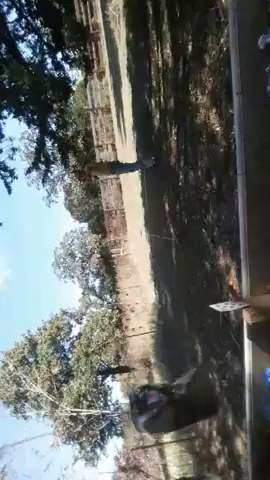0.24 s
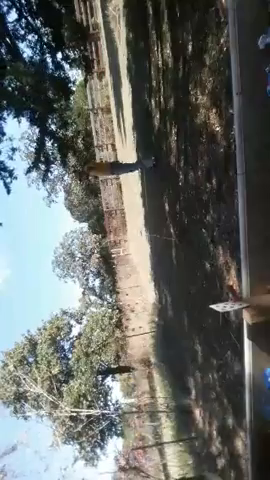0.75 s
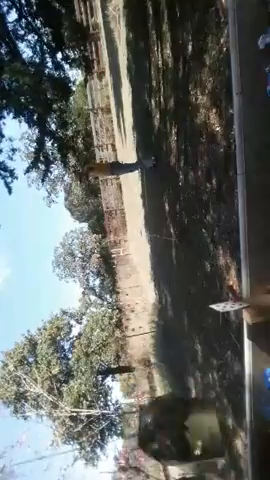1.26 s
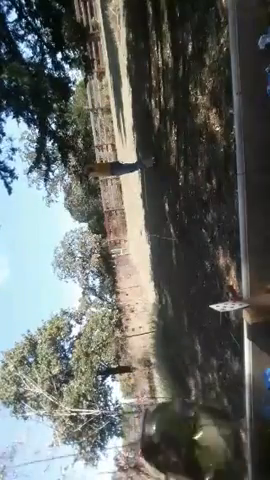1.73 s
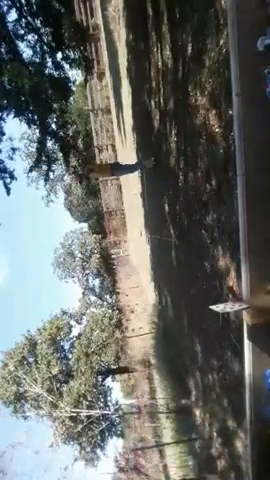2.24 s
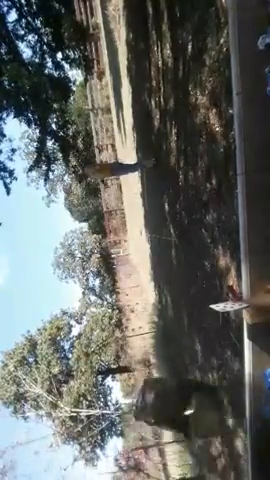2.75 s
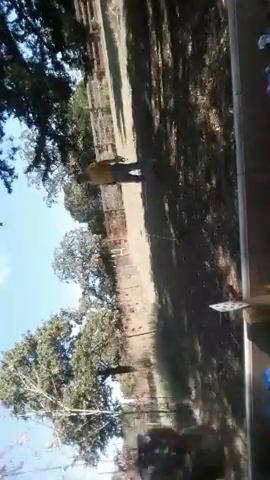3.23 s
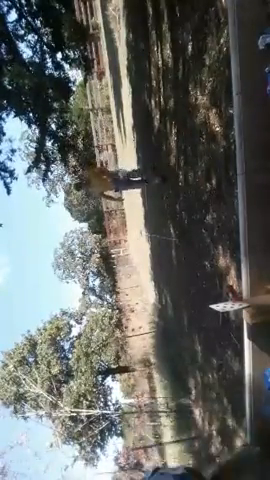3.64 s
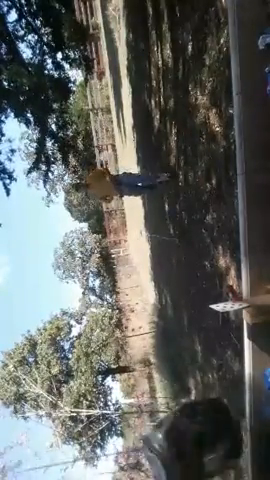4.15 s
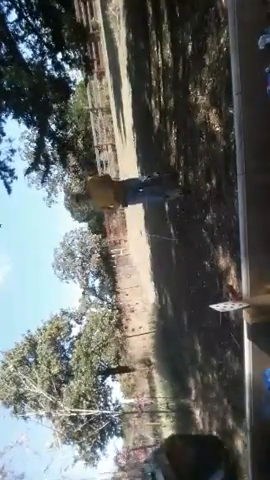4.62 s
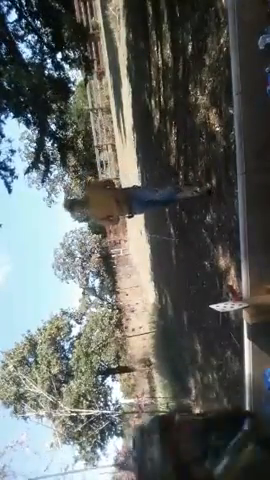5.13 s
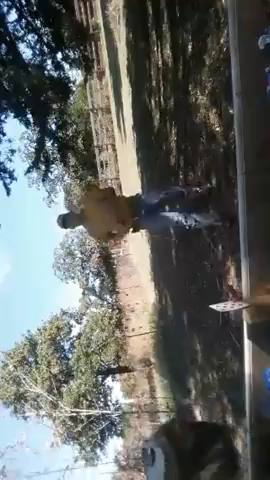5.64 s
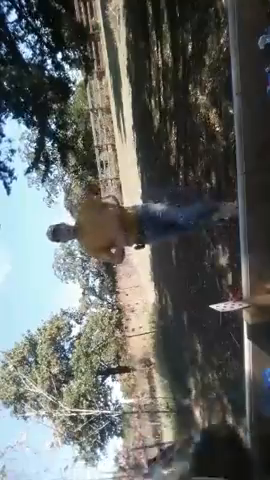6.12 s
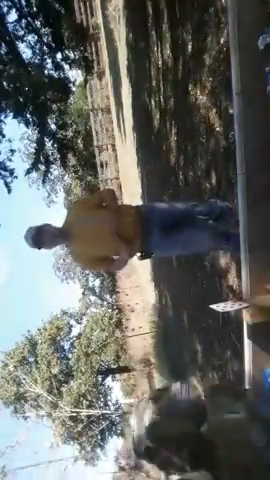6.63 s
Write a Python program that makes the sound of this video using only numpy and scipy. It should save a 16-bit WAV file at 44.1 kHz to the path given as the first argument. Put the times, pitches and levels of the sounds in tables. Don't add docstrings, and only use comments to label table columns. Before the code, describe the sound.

A quiet outdoor yard with low rumble, distant drone and faint leaf hiss. A little past two seconds, rubber bands snap and a ball tears into a dented can right beside a small camera microphone, which overloads. Bright clattering knocks die within half a second into small metallic chatter. The background ducks, then returns, and someone walks through dry grass, snapping stalks.

```python
import sys
import numpy as np
from scipy import signal
from scipy.fft import rfft, irfft, next_fast_len
from scipy.io import wavfile
from scipy.ndimage import uniform_filter1d

SR = 44100
rng = np.random.default_rng(int(sys.argv[2]) if len(sys.argv) > 2 else 0)


def output_pcm(signal):
    pcm = np.clip(np.atleast_2d(signal).T, -1, 1) * 32767
    wavfile.write(sys.argv[1], SR, np.round(pcm).astype(np.int16))


def gain_from_decibels(decibels):
    exponent = np.asarray(decibels, float) / 20
    return 10 ** exponent


N = 302967

# freq_hz, level_db, t60_s
HOLLOW_MODES = [(340, -15.5, 0.17), (517.7, -7, 0.17), (555.2, -2.5, 0.081), (790, -1.5, 0.14),
                (966.3, -3.5, 0.095), (1023, 2, 0.033), (1155.6, -3, 0.13), (1172, -6.5, 0.14),
                (1287, -4.5, 0.12), (1476, -7.5, 0.25), (1563, -2, 0.059), (1790, -8, 0.13),
                (2020, -13, 0.14), (2254, -11.5, 0.21)]
# freq_hz, level_db, t60_s
WALL_MODES = [(2610, -22, 0.73), (2642, -18, 0.21), (2850, -13, 0.059), (3090, -13, 0.13),
              (3260, -6, 0.082), (3580, -1.5, 0.017), (3920, -12, 0.062), (4020, -17.5, 0.056),
              (4220, -21, 0.17)]
# freq_hz, density_db_per_hz
SKIN_SPECTRUM = [(180, -32), (400, -8.5), (1000, -5.5), (1600, -1.5), (2100, -7.5), (3300, -5.5),
                 (4200, -11.5), (5000, -18), (6200, -26.5), (7500, -19.5), (8650, -1), (9800, -13.5),
                 (11500, -31.5), (14300, -41.5)]
# freq_hz, density_db_per_hz
GRASS_SPECTRUM = [(590, -50), (1000, -14.5), (1190, -5.5), (1690, -6), (3400, -3), (5930, -14.5),
                  (9050, 5.5), (10700, -14), (12200, -26.5), (14300, -7.5)]


def evened(x):
    return x / np.sqrt(np.mean(x ** 2) + 1e-20)


def peaked(x):
    return x / np.max(abs(x))


def read(points, hz):
    f, value = np.transpose(points)
    return np.interp(np.log(hz + 1), np.log(f + 1), value)


def colour(x, points, lo_hz=0, hi_hz=SR):
    size = next_fast_len(len(x))
    hz = np.fft.rfftfreq(size, 1 / SR) + 1
    edges = 1 / np.sqrt((1 + (lo_hz / hz) ** 12) * (1 + (hz / hi_hz) ** 40))
    return irfft(rfft(x, size) * gain_from_decibels(read(points, hz)) * edges, size)[:len(x)]


def placed(source, events):
    line = np.zeros(N)
    for start_s, *settings in events:
        sound = source(*settings)
        part = line[max(round(start_s * SR), 0):][:len(sound)]
        part += sound[:len(part)]
    return line


def yard(points, level_db, patchy_db, swell_db):
    frames, hz = N // 256 + 5, np.fft.rfftfreq(1024, 1 / SR)
    a, b, patches = rng.standard_normal((frames, 513, 3)).T
    patches = uniform_filter1d(patches, size=6, axis=0)
    patches = evened(uniform_filter1d(patches, size=12, axis=1))
    swell = evened(uniform_filter1d(rng.standard_normal(frames), size=20))
    z = (a + 1j * b) * gain_from_decibels(read(points, hz)[:, None] + patchy_db * patches + swell_db * swell)
    return evened(signal.istft(z, nperseg=1024, noverlap=768)[1][:N]) * gain_from_decibels(level_db)


def background():
    # freq_hz, density_db_per_hz
    rumble = [(12, -44), (20, -13), (27, -19), (107, 2), (163, -6.5), (211, -6), (247, -11.5), (300, -13.5),
              (390, -42), (660, -120)]
    # freq_hz, density_db_per_hz
    hiss = [(410, -33.5), (700, -4.5), (774, -3.5), (1160, -5.5), (1530, -2.5), (1990, -5.5), (3520, -5),
            (3940, -2.5), (4820, -12), (6870, -20.5), (8840, 3), (10300, -19), (11200, -40.5), (13400, -29),
            (14300, -29)]
    # freq_hz, density_db_per_hz
    drone = [(160, -28), (280, -2), (344, -5), (394, -3.5), (460, -6.5), (500, 3), (534, -6), (645, -15.5),
             (800, -14.5), (1040, -43), (1760, -120)]
    # time_s, gain_db
    camera_gain = [(0.0, -6), (0.9, -2.5), (1.22, 0.5), (1.9, 1), (2.5, 1.5), (2.59, -5.5), (2.85, -10.5),
                   (3.17, -15), (3.4, -11.5), (4.05, 4), (4.4, -2), (4.82, 3), (5.55, -0.5), (5.9, 4),
                   (6.15, 0.5), (6.48, 2), (6.87, -2.5)]
    t = np.arange(N) / SR
    gust_s, gust_width_s, gust_peak_db = 2.44, 0.06, 10
    gust_db = gust_peak_db * np.exp(-((t - gust_s) / gust_width_s) ** 2)
    lull_start_s, lull_db_per_s = 4, -1.07
    lull_db = lull_db_per_s * np.maximum(t - lull_start_s, 0)
    mix = yard(rumble, -61.5 + gust_db, 0.79, 0.97)
    mix += yard(hiss, -69.5 + lull_db, 0.93, 0.35)
    mix += yard(drone, -69.5 + gust_db, 2.4, 0.93)
    return mix * gain_from_decibels(np.interp(t, *np.transpose(camera_gain)))


def tone(db, hz, t60_s):
    t = np.arange(SR // 3) / SR
    return gain_from_decibels(db - 60 * t / t60_s) * np.sin(2 * np.pi * hz * t) * (1 - np.exp(-t / .002))


def lone_modes():
    # start_s, level_db, pitch_hz, t60_s
    touches = [(0, -62, 790, 0.091), (0, -59.5, 520, 0.17), (2.374, -18.5, 443, 0.04),
               (2.4485, -16.5, 586, 0.034), (2.4485, -23.5, 367, 0.031), (3.828, -52.5, 812, 0.39),
               (5.381, -42, 531, 0.058), (3.712, -56, 527, 0.074), (2.9, -59, 802, .45),
               (2.9, -57, 1144, .4), (3.19, -68, 795, .5), (3.2, -67, 1147, .5), (3.229, -63, 1550, 0.11),
               (3.3, -62, 1290, 0.27), (3.3, -59.5, 1690, .07), (3.3, -62, 3280, 0.1),
               (3.087, -50, 3770, 0.12), (4.036, -28.5, 3590, .06), (4.036, -33, 4300, 0.035),
               (3.825, -49, 3580, 0.052), (3.826, -52, 1300, 0.13)]
    return placed(tone, touches)


def ring(modes, t, scale, spread_db):
    hz, db, t60_s = np.transpose(modes)[:, :, None]
    luck = rng.standard_normal((2, len(modes), 1))
    fade_db = db + spread_db * luck[0] - 60 * t / (scale * np.clip(t60_s, .03, .18))
    detuned_hz = hz * (1 + 0.0052 * luck[1])
    onset = 1 - np.exp(-t * hz / 3.0)
    sines = gain_from_decibels(fade_db) * np.sin(2 * np.pi * detuned_hz * t) * onset
    return signal.sosfilt(signal.butter(4, 300, "high", fs=SR, output="sos"), sines.sum(0))


def skin(count, share):
    a, b, pick = rng.standard_normal((3, count // 2 + 1))
    return irfft((a + 1j * b) * (abs(pick) < share), count)


def knock(db, hollow_db, bright_db, crumple_s, t60_s):
    t = np.arange(SR // 3) / SR
    sharp = np.exp(-crumple_s / 0.011)
    push = rng.standard_normal(len(t)) * np.exp(-t / crumple_s) * 0.048 + np.exp(-t / .0001)
    fall = gain_from_decibels(-60 * np.maximum(t - crumple_s, 0) / t60_s)
    fall *= 1 + 3 * sharp * np.exp(-t / .003)
    fall *= 1 - np.exp(-t / (0.44 * crumple_s))
    hollow, wall = (signal.fftconvolve(push, ring(modes, t, t60_s / 0.11, 2.6))[:len(t)]
                    for modes in (HOLLOW_MODES, WALL_MODES))

    top_hz = np.clip(14500 + 330 * (db + 8), 10400, 14500)
    crowd = skin(len(t), 0.39)
    dull = colour(crowd, SKIN_SPECTRUM, 280, 6400) * fall
    bright = colour(crowd * fall ** 1.7, SKIN_SPECTRUM, 6500, top_hz)
    spike = colour(rng.standard_normal(len(t)), SKIN_SPECTRUM, 310, top_hz)
    spike *= t * np.exp(-t / 0.00045)

    sound = gain_from_decibels(-9) * peaked(dull) + gain_from_decibels(-13) * peaked(wall) + gain_from_decibels(-8.0) * sharp * peaked(spike)
    sound += gain_from_decibels(hollow_db + 4.0) * peaked(hollow) + gain_from_decibels(bright_db + 3.5) * peaked(bright)
    return gain_from_decibels(db) * sound * np.cos(np.pi / 2 * t / t[-1]) ** 2


def glances():
    # start_s, peak_db, hollow_db re peak, bright_db re peak
    touches = [(0.0014, -67.5, -2, -9), (1.1135, -73, -14, 9), (1.332, -61, -6, -10),
               (2.4077, -12.5, -16.5, -9.5), (2.5024, -14.5, -15.5, -17), (2.5725, -19, -24, -12),
               (2.5989, -37, -28, -12), (2.6612, -43.5, -2.5, -5), (2.698, -49, 7.5, -6),
               (2.733, -48, 8.5, -1.5), (2.773, -45, 2, -8), (2.8219, -39.5, 3.5, -6.5),
               (2.8594, -36, -7.5, -12), (2.899, -44, -21.5, -24), (3.0069, -75, 5, -23),
               (3.1064, -34.5, -14, -9), (3.2988, -51, -3, -20), (3.7104, -60.5, -3, -18),
               (4.1984, -49.5, -7.5, -21), (4.8272, -51, -7, -19), (4.8683, -50, -4, -1.5),
               (5.3649, -56, -5, -16), (5.3804, -51, -5, -9.5), (5.482, -60.5, -2.5, -15)]
    crumple_s, t60_s = 0.0046, 0.13
    return placed(knock, [(*row, crumple_s, t60_s) for row in touches])


def burst(spectrum, tilt_db_per_octave, db, rise_s, hold_s, t60_s):
    t = np.arange(SR // 4) / SR
    tilted = [(hz, level + tilt_db_per_octave * np.log2(hz / 3000)) for hz, level in spectrum]
    fall_db = -60 * np.maximum(t - hold_s, 0) / t60_s - 160 * t
    shape = np.minimum(t / rise_s, 1) ** 2 * gain_from_decibels(fall_db)
    return gain_from_decibels(db) * peaked(colour(skin(len(t), 0.45), tilted, 390) * shape)


def sling():
    # start_s, peak_db, rise_s, hold_s, t60_s
    snaps = [
        (2.2234, -41, 0.00046, 0.0025, 0.071),
        (2.2371, -24, 0.00043, 0.0028, 0.074),
        (2.262, -19.5, 0.0033, 0.0036, .035),
        (2.267, -35.5, 0.0042, 0.032, .2),
    ]
    # freq_hz, density_db_per_hz
    rubber = [(180, -37.5), (300, -7), (520, -5.5), (1080, -28), (1690, -8.5), (2370, -16.5), (3920, -5),
              (6360, -25.5), (7980, -2.5), (9080, -3.5), (14300, -27)]
    return placed(lambda *row: burst(rubber, -0.33, *row), snaps)


def thumps():
    # start_s, level_db, pitch_hz, t60_s
    blows = [
        (2.2375, -30, 482.4, 0.049),
        (2.2373, -27.5, 150, 0.033),
        (2.316, -9, 143, 0.033),
        (2.3158, -13, 481, .05),
        (2.315, -24, 60.1, .05),
        (4.745, -51, 321.5, 0.14),
    ]
    return placed(tone, blows)


def tear():
    # start_s, peak_db, rise_s, hold_s, t60_s
    blows = [
        (2.3142, 0.5, 0.00036, 0.014, 0.14),
    ]
    # freq_hz, density_db_per_hz
    metal = [(120, -37.5), (200, -5.5), (307, -16.5), (463, -6), (1240, -14), (1740, -5.5), (1970, -12.5),
             (3360, -7.5), (5350, -16), (7510, -11.5), (8660, 0), (13300, -23), (14300, -27.5)]
    return placed(lambda *row: burst(metal, -0.47, *row), blows)


def knocks():
    # start_s, peak_db, hollow_db re peak, bright_db re peak, crumple_s
    hits = [
        (2.354, -12, -13.5, -27.5, 0.0071),
        (2.3726, -15.5, -10, -6, 0.0046),
        (2.3875, -9, -16.5, 0.5, .0008),
        (2.449, -16, -13, -11.5, 0.003),
        (2.4785, -5.5, -17.5, -17.5, 0.0064),
        (2.5416, -14.5, -8, -7, 0.0083),
        (2.783, -34.5, -4.5, -8, 0.00089),
        (3.0874, -32, -16.5, -3.5, 0.0017),
        (3.825, -34, -17, -8.5, 0.0027),
        (4.0352, -17.5, -19, -6.5, 0.0024),
    ]
    t60_s = 0.15
    return placed(knock, [(*row, t60_s) for row in hits])


def crackle(count, per_s, spread_db):
    size = gain_from_decibels(spread_db * np.minimum(rng.exponential(1, count), 4)) * rng.choice([-1, 1], count)
    return size * (rng.random(count) < per_s / SR)


def laid(spells):
    rise_s, depth_db = 0.012, 44

    def spell(db, hold_s, fall_db_per_s):
        t = np.arange(0, rise_s + hold_s + depth_db / fall_db_per_s, 1 / SR)
        fall_db = fall_db_per_s * np.maximum(t - rise_s - hold_s, 0)
        return np.minimum(t / rise_s, 1) ** 2 * gain_from_decibels(db - fall_db)

    return placed(spell, [(start_s - rise_s, *row) for start_s, *row in spells])


def chatter():
    # start_s, level_db, hold_s, fall_db_per_s
    scrapes = [
        (2.585, -33.5, 0.0022, 804),
        (2.632, -51, 0.18, 192),
        (2.782, -43, 0.06, 143.5),
        (3.0, -80.5, 0.014, 199.5),
        (3.2, -73, 0.095, 206.5),
        (3.31, -74.5, 0.084, 124.5),
        (4.08, -57.5, 0.0056, 298.5),
        (4.195, -60, 0.0047, 63),
    ]
    t = np.arange(SR // 6) / SR
    touches = [crackle(N, 320, 5.1) for _ in range(3)]
    hollow, wall = (evened(signal.fftconvolve(x, ring(modes, t, 0.58, 0.81))[:N])
                    for x, modes in zip(touches, (HOLLOW_MODES, WALL_MODES)))
    noise = rng.standard_normal(N) * (uniform_filter1d(abs(touches[2]), 150) + 0.079)
    dull = evened(colour(noise, SKIN_SPECTRUM, 390, 5700))
    bright = evened(colour(noise, SKIN_SPECTRUM, 7400, 10500))
    mix = gain_from_decibels(-1.0) * hollow + gain_from_decibels(-21) * wall + gain_from_decibels(-8.5) * dull + gain_from_decibels(-15) * bright
    return laid(scrapes) * mix


def snap(db, hz, bright_db):
    t = np.arange(SR // 30) / SR
    noise = rng.standard_normal((2, len(t)))
    pitch = [(hz / 2, -20), (hz, 0), (hz * 2, -12), (hz * 4, -30)]
    body = colour(noise[0], pitch) * gain_from_decibels(-60 * t / 0.023)
    tick = colour(noise[1], GRASS_SPECTRUM, 4200) * gain_from_decibels(-60 * t / 0.018)
    return gain_from_decibels(db) * (gain_from_decibels(-14) * peaked(body) + gain_from_decibels(bright_db + 4.0) * peaked(tick))


def stalks():
    # start_s, peak_db, centre_hz, bright_db re peak
    snaps = [(4.084, -32, 2070, -26), (4.137, -33.5, 3450, -10.5), (4.5858, -37.5, 2030, -12.5),
             (4.6025, -36, 2460, -16.5), (4.6476, -46.5, 1510, -4.5), (4.8986, -38.5, 1390, 0.5),
             (4.9292, -44.5, 3680, -1.5), (4.9568, -46, 2380, -8), (5.2214, -48.5, 1510, -8),
             (5.693, -51, 4310, -10.5), (5.7824, -49.5, 1753, -3), (5.811, -42.5, 2700, -10),
             (6.2618, -32, 2537, -38), (6.3101, -40, 1890, -12.5), (6.3602, -34.5, 1720, -23),
             (6.4498, -40.5, 3570, -10), (6.8536, -48.5, 2470, -4)]
    return placed(snap, snaps)


def rustle():
    # start_s, level_db, hold_s, fall_db_per_s
    steps = [(4.088, -54.5, 0.039, 400), (4.156, -62.5, 0.1, 146), (4.605, -59.5, 0.0043, 97),
             (4.748, -69.5, 0.27, 154), (4.895, -58.5, 0.016, 158), (5.04, -74, 0.37, 60),
             (5.78, -66.5, .005, 70), (5.9, -66.5, .015, 299.5), (6.262, -59, .005, 80),
             (6.462, -70.5, 0.0047, 249), (6.855, -69, 0.031, 98.5)]
    grains = evened(crackle(N, 2300, 4.3)) + 0.37 * rng.standard_normal(N)
    return laid(steps) * evened(colour(grains, GRASS_SPECTRUM))


def scene():
    mix = background() + lone_modes() + glances()
    mix += sling() + thumps() + tear() + knocks() + chatter()
    mix += stalks() + rustle()
    return mix[None]


def band_limit(x):
    return signal.sosfilt(signal.butter(12, 14430, fs=SR, output="sos"), x)


def record(dry):
    held = .62 * np.tanh(dry / .62)
    lowpass = signal.firwin(511, 14100, window=("kaiser", 9), fs=SR)
    held = signal.oaconvolve(held, lowpass[None], "same")
    return band_limit(held)


dry = scene()
out = record(dry)
output_pcm(out)
```